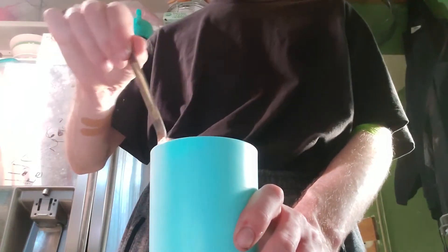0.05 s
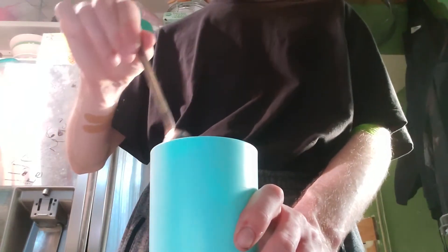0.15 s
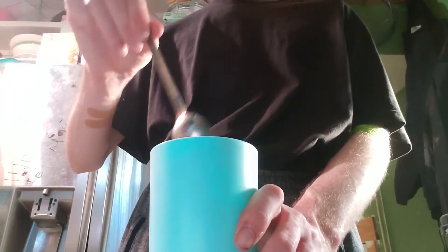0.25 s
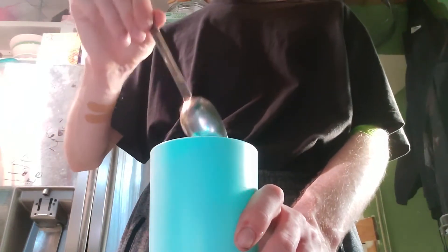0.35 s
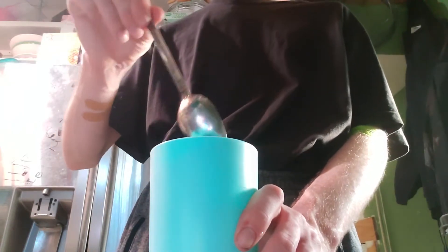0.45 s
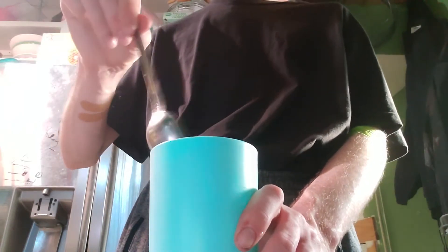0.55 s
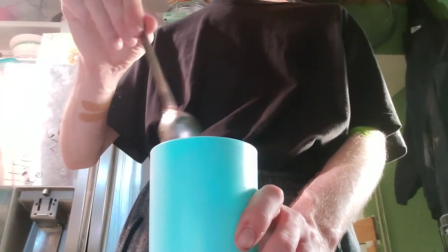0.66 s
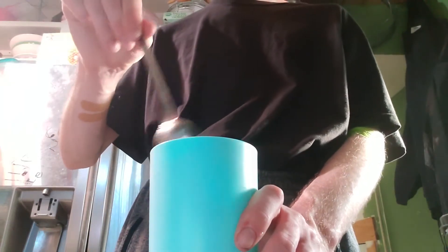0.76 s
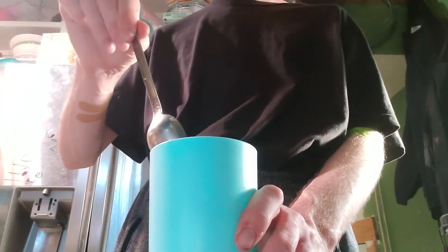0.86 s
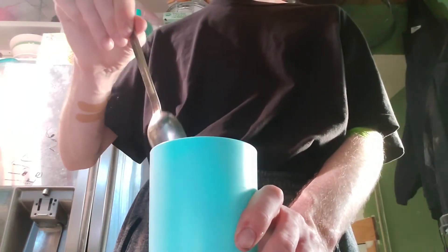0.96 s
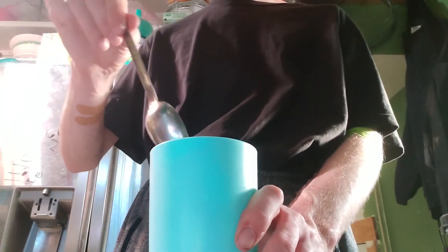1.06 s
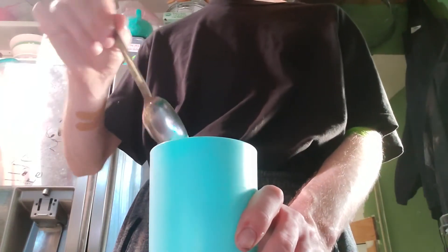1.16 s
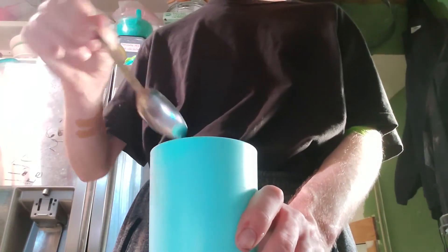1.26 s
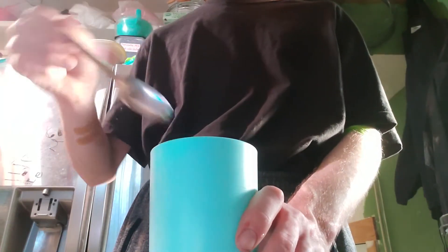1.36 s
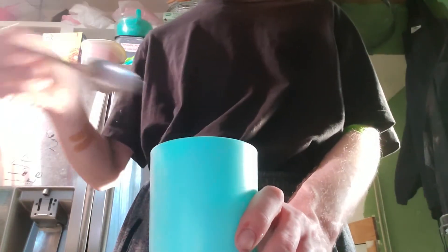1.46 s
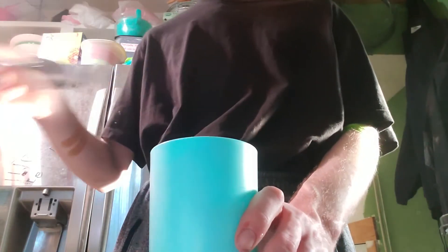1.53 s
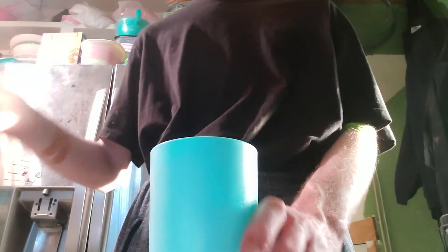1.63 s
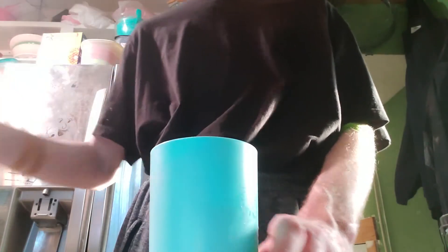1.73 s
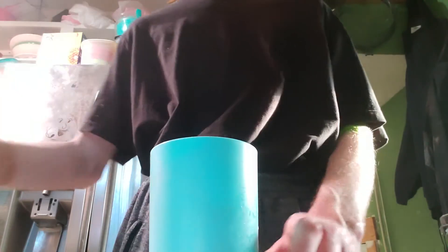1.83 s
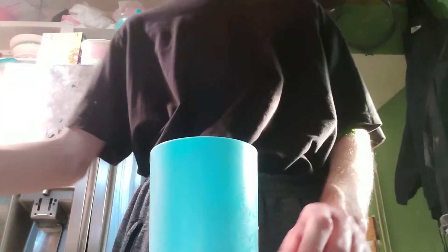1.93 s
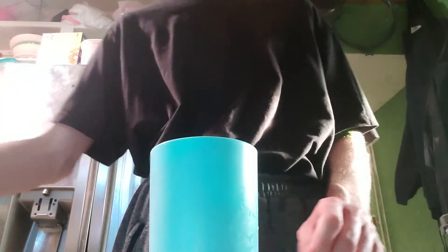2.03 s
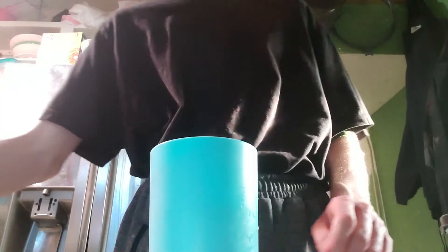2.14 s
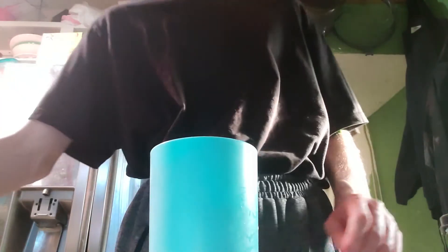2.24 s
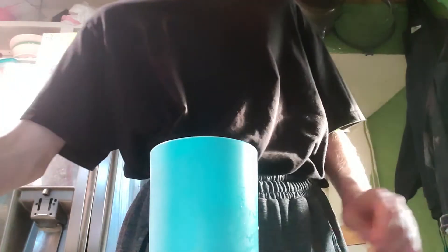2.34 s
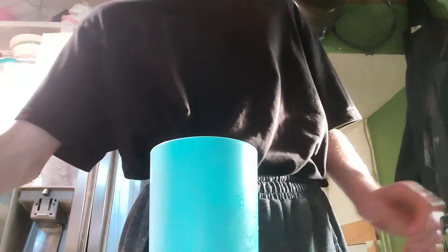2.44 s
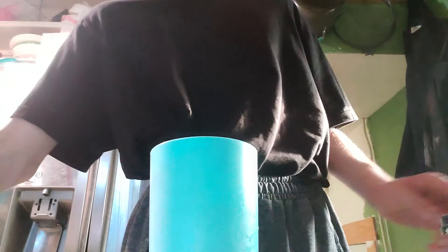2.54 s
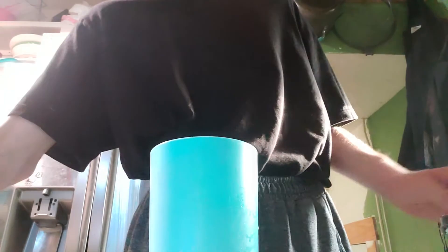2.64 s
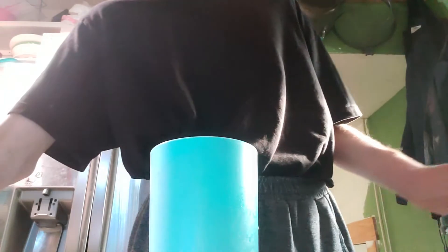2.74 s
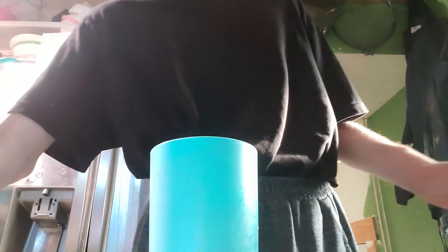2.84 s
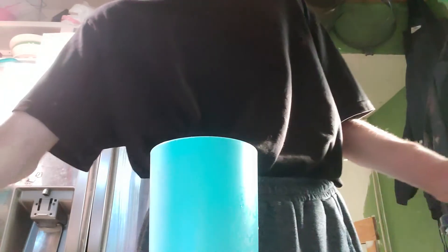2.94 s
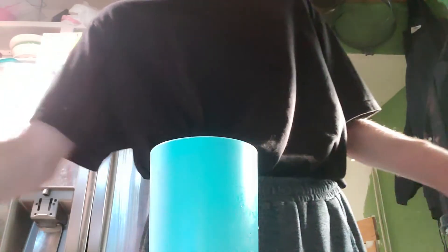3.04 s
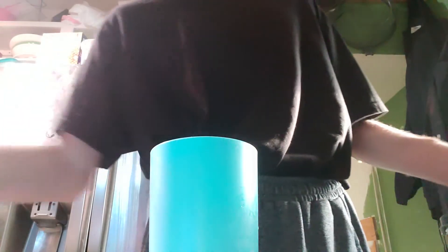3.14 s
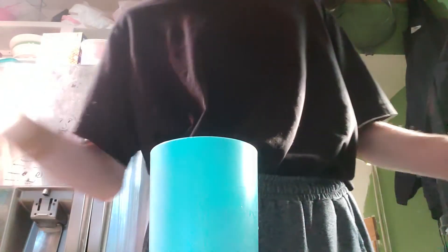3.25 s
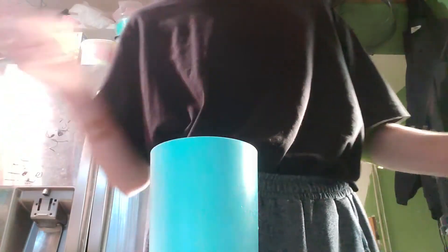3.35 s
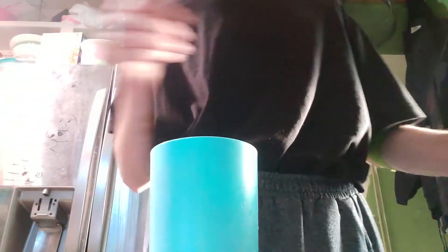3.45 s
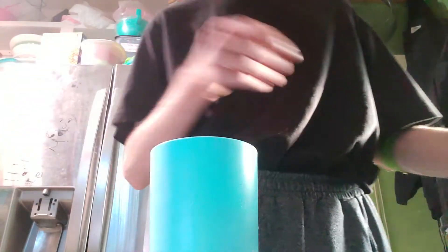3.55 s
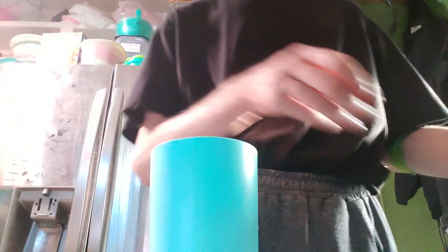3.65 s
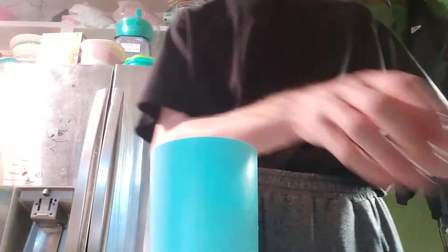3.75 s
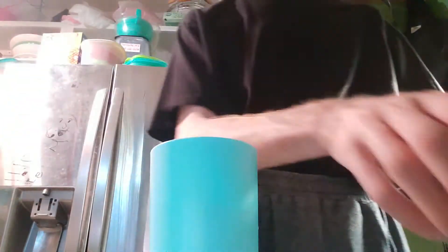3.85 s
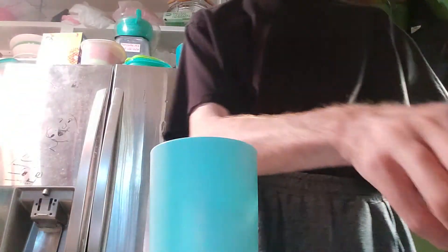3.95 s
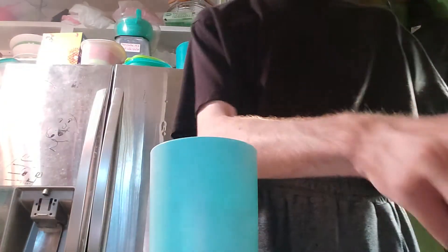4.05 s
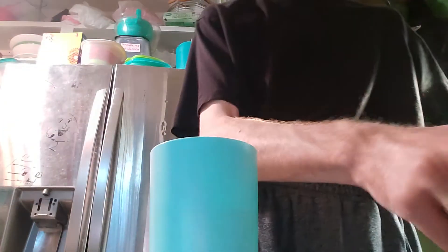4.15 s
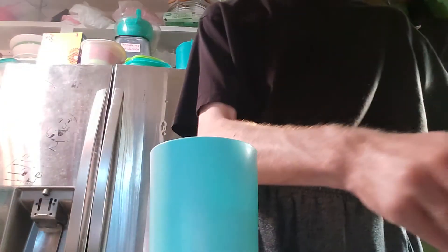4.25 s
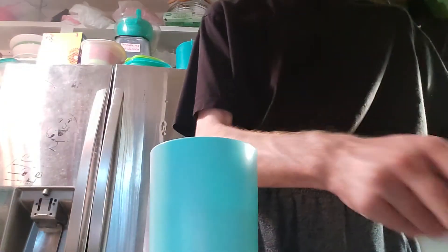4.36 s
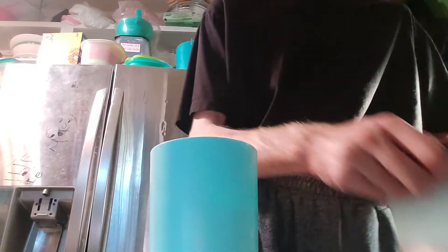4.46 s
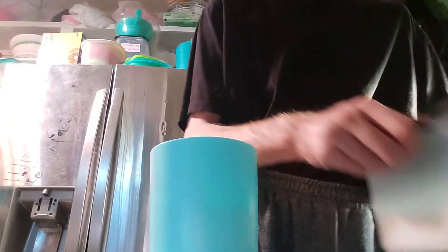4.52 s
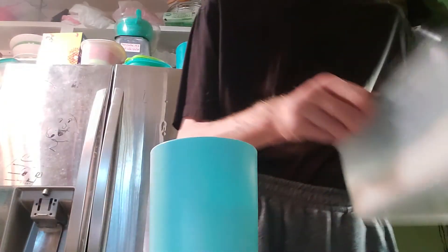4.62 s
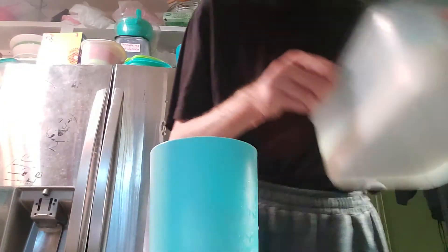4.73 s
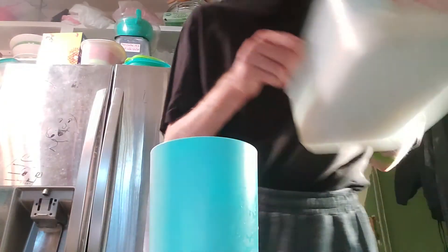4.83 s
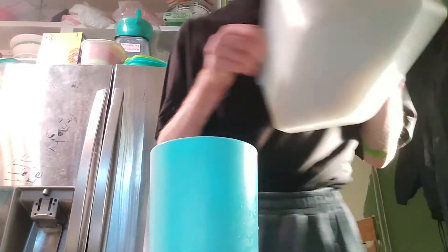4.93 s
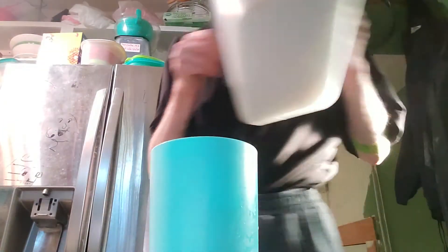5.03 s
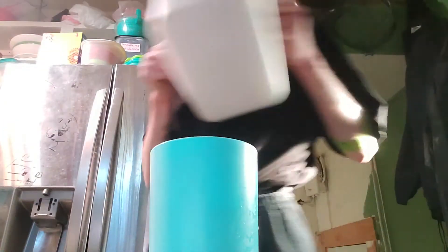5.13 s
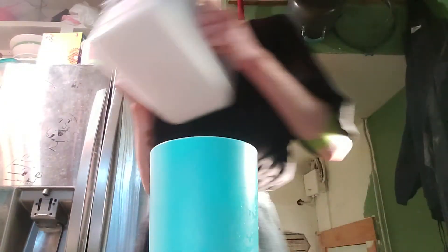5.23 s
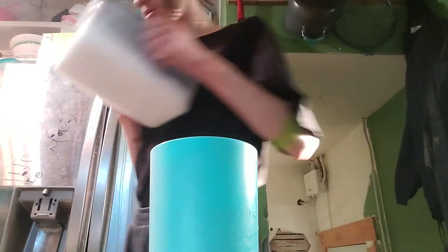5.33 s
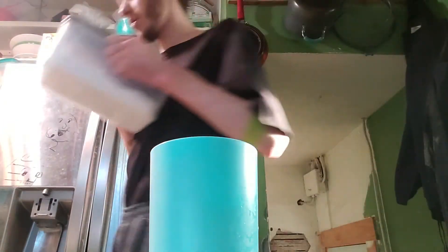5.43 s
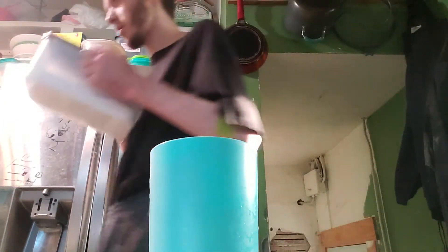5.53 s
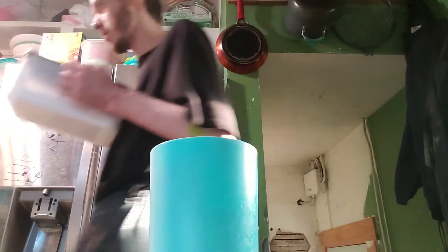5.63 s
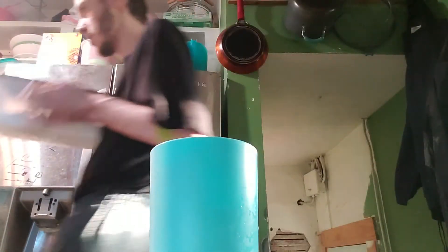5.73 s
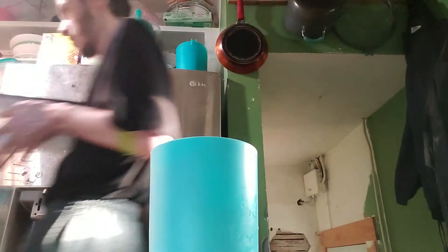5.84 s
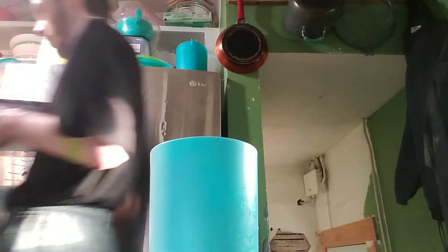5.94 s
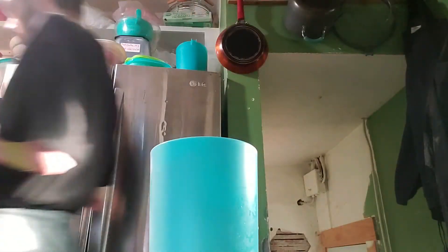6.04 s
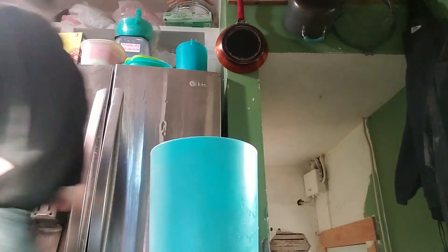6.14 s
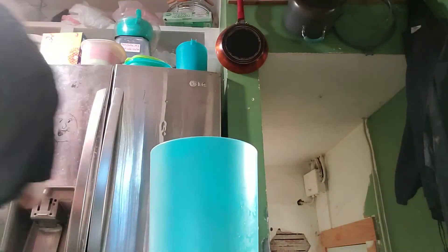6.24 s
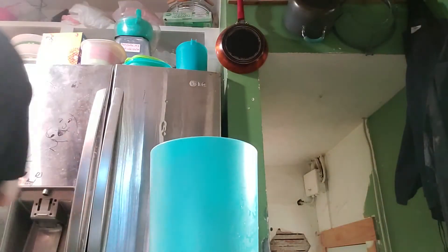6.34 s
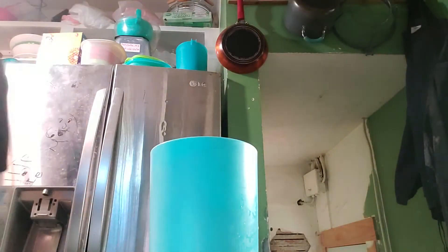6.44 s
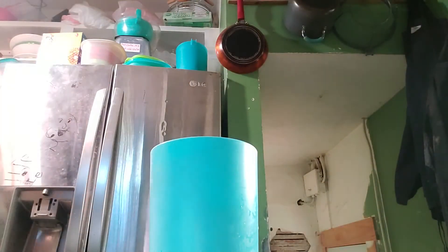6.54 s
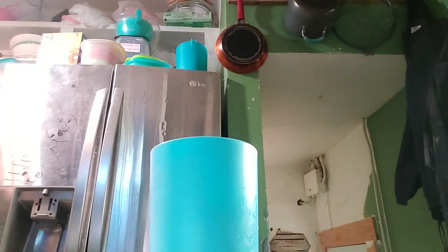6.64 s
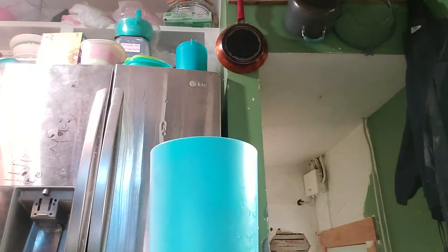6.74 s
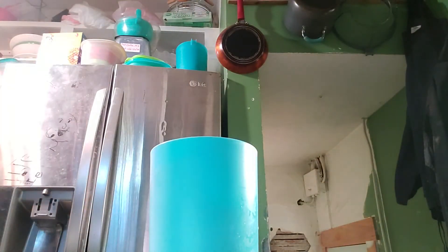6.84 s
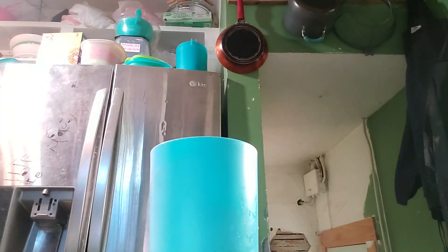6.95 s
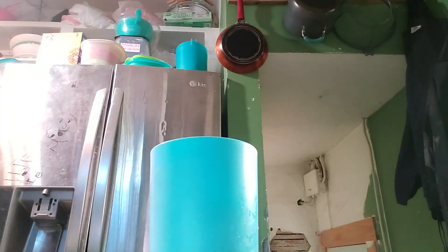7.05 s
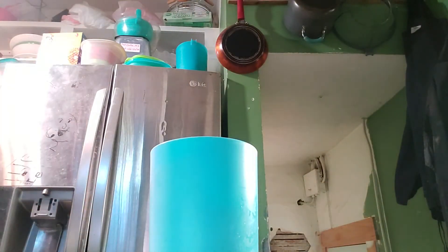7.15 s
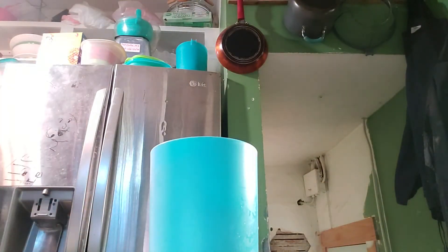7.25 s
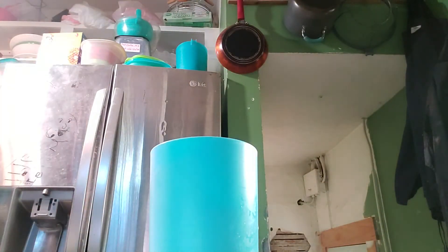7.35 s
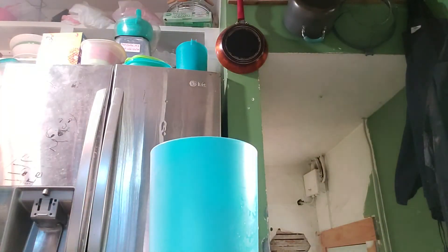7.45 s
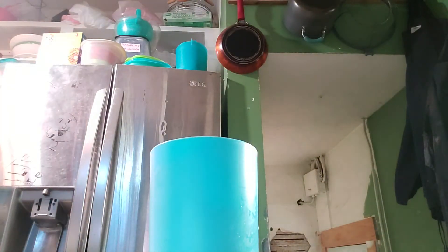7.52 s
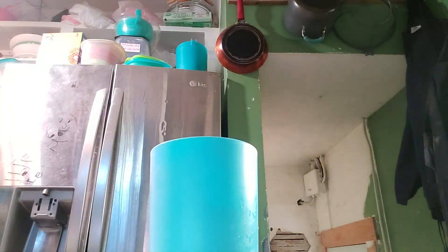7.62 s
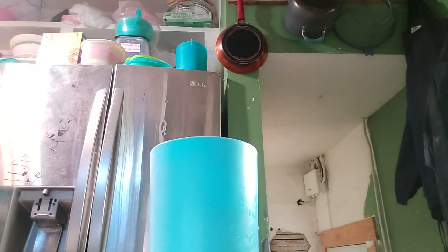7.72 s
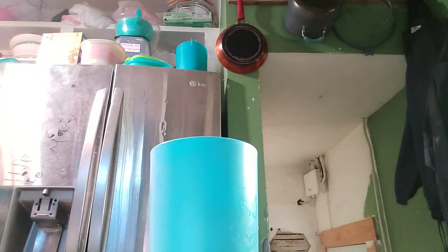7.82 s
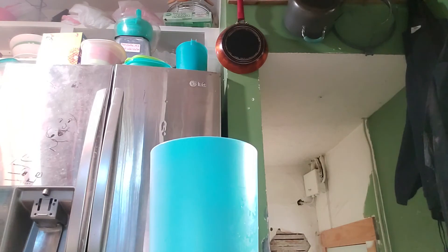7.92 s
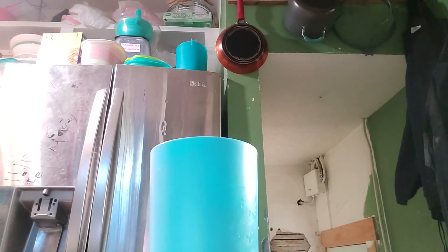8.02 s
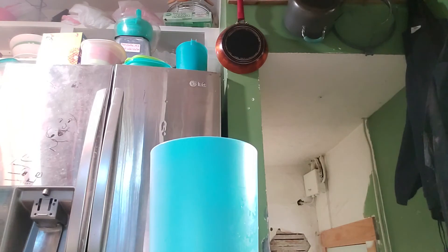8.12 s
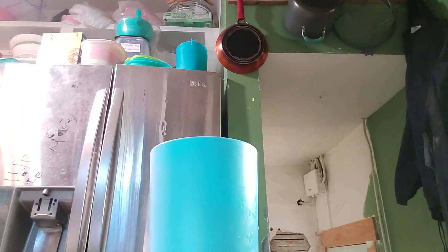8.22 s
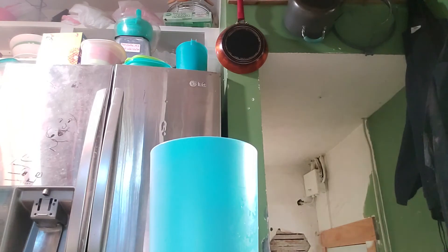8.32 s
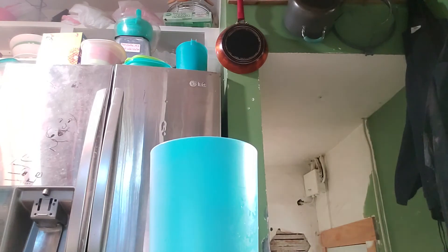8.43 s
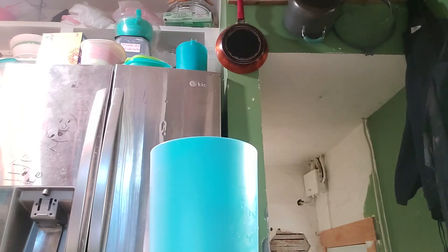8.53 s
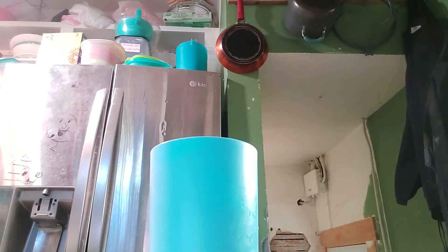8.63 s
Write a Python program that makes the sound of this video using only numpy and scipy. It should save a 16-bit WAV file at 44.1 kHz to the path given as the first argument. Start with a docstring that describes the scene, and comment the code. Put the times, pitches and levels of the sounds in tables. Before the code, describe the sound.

A spoon scrapes and taps a plastic cup, then clatters onto a counter; plastic knocks and shuffling slippers follow over a low fan hum.

```python
"""At a kitchen counter, close to a stereo microphone, a spoon scrapes and taps a plastic cup.
Near 3 s something hollow is set down, and the spoon bounces, rings and comes to rest.
Around 4 s a plastic tub is picked up with rubs and knocks; from 5 s slippers shuffle off over the floor.
A fan throbs behind it all; the recorder's gain ducks at the loud knocks and creeps back."""
import sys
import numpy as np
from scipy import signal
from scipy.fft import rfft, irfft, next_fast_len
from scipy.io import wavfile
from scipy.ndimage import uniform_filter1d

SR = 44100
rng = np.random.default_rng(int(sys.argv[2]) if len(sys.argv) > 2 else 0)


def wav_out(sig):
    """Save sig, one row per channel (or a flat mono array), as 16-bit PCM at SR to the path in sys.argv[1]."""
    wavfile.write(sys.argv[1], SR, np.round(np.clip(np.atleast_2d(sig).T, -1, 1) * 32767).astype(np.int16))


N = 382788
T = np.arange(N) / SR

# knocks on cup and tub close to the microphone, and a soft thud at 4.67 s: (time [s], thump level [dB], thump
# pitch [Hz], # crack level [dB], crack t60 [s], counter ring [dB], cup ring [dB])
PLASTIC_KNOCKS = [(0.053, -24, 163, -32, 0.064, -32, -41.5), (0.6337, -9, 151, -15, 0.066, -18.5, -28.5),
                  (0.8583, -3.5, 167, -20, 0.1, -15.5, -28.5), (0.896, -13.5, 116.7, -33, 0.13, -28, -47),
                  (0.966, -44, 200, -33.5, 0.076, -51, -41.5), (3.953, -38.5, 289.5, -60, 0.075, -38, -82),
                  (4.1236, -12, 251.3, -26, 0.026, -37, -67.5),
                  (4.1293, -25.5, 525, -29, 0.023, -31.5, -52), (4.249, -42.5, 920, -45, 0.049, -37, -75),
                  (4.312, -37.5, 870, -40, 0.086, -34, -68), (4.666, -33.5, 153.5, -52.5, 0.12, -49, -69),
                  (4.829, -57, 304, -51.5, 0.032, -66, -82)]
# modes of the cup's wall: (frequency [Hz], level [dB], t60 [s])
CUP_MODES = [(636.2, 2.5, 0.085), (824, -4.5, 0.15), (1185, -11.5, 0.088), (1604, -4.5, .08),
             (2047, -9, 0.042), (2320, -8, 0.02), (2924, 1.5, 0.071), (2980, -9, 0.042), (4140, 6.5, .018),
             (5530, -10, 0.1)]
# modes of the counter top when it rings freely: (frequency [Hz], level [dB], t60 [s])
COUNTER_MODES = [(75.5, -9.5, 0.46), (108, -8, 0.16), (151, -5.5, .24), (178, -1.5, .52), (221, -7, .36),
                 (243, -.5, .3), (318.7, -13, 0.22), (424, -9.5, .33), (463, -14.5, 0.42),
                 (545.6, -8.5, 0.19), (598, -9.5, 0.24), (672, -16.5, .25), (748, -18.5, .22),
                 (791, -20, .3), (932, -14.5, .28), (1063, -16.5, 0.21), (1140, -16.5, .33),
                 (1290, -24, .3), (1470, -20, .3), (1540, -17.5, .26), (1793, -21, .35), (2135, -22.5, .3),
                 (2307, -17.5, .3), (2562, -19, 0.5), (2660, -15.5, .3), (2951, -17.5, 0.33)]
def plastic_taps():
    """Plastic gives a dry crack and a hollow thump that runs on into the counter."""
    body = np.zeros((2, N))
    for s, thump_db, hz, _, _, counter_db, cup_db in PLASTIC_KNOCKS:
        add(body, s, from_db(thump_db) * thump(hz, swell_s=0.0031))
        add(body, s, from_db(cup_db) * strike(CUP_MODES, contact_hz=7000))
        add(body, s, from_db(counter_db) * strike(COUNTER_MODES, contact_hz=380, damping=1.3))
    times, _, _, crack_db, t60s, _, _ = np.transpose(PLASTIC_KNOCKS)
    knocks = body + cracks(times, crack_db, t60s, PLASTIC_CRACK)
    return butterworth(knocks, "high", hz=88, order=5)  # the knocks carry no deep bass


# strokes of the spoon along the cup's wall: (time [s], swell [s], hold [s], level [dB])
CUP_STROKES = [(.06, .02, 0.05, -60.5), (.22, .03, 0.021, -60), (.355, .04, 0.012, -57.5),
               (.45, .015, 0.079, -68.5), (.528, .016, .045, -51), (.945, 0.014, 0.0026, -57),
               (1.03, .012, 0.083, -70.5)]
# hiss of the spoon's edge: (frequency [Hz], level [dB])
SCRAPE_SPECTRUM = [(800, -23), (2000, -18), (2900, -11), (3600, -11), (4300, -2.5), (5200, -1),
                   (6500, -5.5), (7600, -18.5), (10000, -26.5), (13800, -23.5), (16000, -36.5)]
# modes that the sliding spoon makes sing: (frequency [Hz], relative level [dB], t60 [s])
SINGING_MODES = [(2760, -9.5, .014), (5050, -6.5, .012), (13780, -28, .03)]
def scrape(sing_db=-61, sing_follow=.35, lift_s=1.35, fade_s=0.15):
    """The spoon's edge hisses along the cup; even a light touch keeps thin tones singing until it lifts."""
    level_db = 20 * np.log10(strokes(CUP_STROKES))
    modes = sum(from_db(db) * ring(hz, t60) for hz, db, t60 in SINGING_MODES)
    singing = rms_one(signal.fftconvolve(rng.standard_normal((1, N)), modes, axes=1)[:, :N])
    touching = np.clip((lift_s - T) / fade_s, 0, 1) * from_db(2.5 * drift(22))
    pressure = from_db(sing_db + sing_follow * (level_db - level_db.max()))
    hiss = from_db(level_db + 2 * drift(170)) * noise(SCRAPE_SPECTRUM, ripple_db=3.5)
    return hiss + touching * pressure * singing


# things landing on the counter, close by: (time [s], counter ring [dB], contact hardness [Hz],
# crack level [dB], crack t60 [s], spoon ring [dB])
LANDINGS = [(2.7959, -14, 1500, -16.5, 0.094, -75.5), (2.803, -21.5, 1500, -23, 0.24, -76.5),
            (3.047, -31, 4000, -33, .035, -73), (3.0919, -9.5, 5000, -9, 0.18, -12),
            (3.102, -17, 3970, -20, 0.085, -16.5), (3.117, -12, 3984, -11.5, .12, -21.5),
            (3.173, -26, 3000, -33, 0.2, -21.5), (3.216, -9, 3004, -10.5, 0.3, -13.5),
            (3.284, -28.5, 3000, -27, 0.066, -30), (3.334, -22, 3000, -53, 0.1, -49)]
# modes of the hollow thing that lands first: (frequency [Hz], level [dB], t60 [s])
HOLLOW_MODES = [(510, -28.5, 0.084), (616, -19.5, 0.26), (702, -20, 0.11), (754.5, -19.5, 0.1),
                (884, -23.5, .14), (1657, -25, 0.091)]
# modes of the steel spoon: (frequency [Hz], level [dB], t60 [s], left over right [dB])
SPOON_MODES = [(4877, -20.5, .25, 6.5), (5499, 1.5, .2, 7.5), (6695, -6.5, .2, -1), (7935, -12.5, .4, -9),
               (8415, -15.5, .3, -5), (9222, -15.5, .2, 1), (9477, -4.5, .22, -4.5),
               (11039, -11.5, .22, -6), (11347, -3.5, 0.2, -1.5), (13740, -14, .22, -9.5),
               (14210, -20, .2, -3.5), (15110, -29.5, .22, 0)]
# crack of a landing: (frequency [Hz], level [dB])
LANDING_CRACK = [(60, -19), (150, -11), (400, -5), (900, -1), (1800, -6.5), (2700, -4.5), (3800, -14.5),
                 (6000, -10.5), (8000, -20.5), (12000, -22.5), (14200, -28), (14800, -38), (16000, -50)]
# the ring is choked as the clatter comes to rest: (time [s], gain [dB])
CHOKE = [(3.34, -4.5), (3.45, -29), (3.6, -48)]
def clatter():
    """A hollow clack on the counter; the spoon then bounces and rings at each touch until it lies still."""
    rings = np.zeros((2, N))
    times, _, _, crack_db, t60s, _ = np.transpose(LANDINGS)
    add(rings, times[0], strike(HOLLOW_MODES, contact_hz=4000))
    for s, counter_db, contact_hz, _, _, spoon_db in LANDINGS:
        add(rings, s, from_db(counter_db) * strike(COUNTER_MODES, contact_hz))
        for hz, mode_db, t60, pan_db in SPOON_MODES:
            push = rng.choice([-1, 1])  # each touch lands on another part of the spoon
            add(rings, s, push * from_db(spoon_db + mode_db) * pan(pan_db) * ring(hz, t60))
    return gain_curve(CHOKE) * (rings + cracks(times, crack_db, t60s, LANDING_CRACK))


# spoon, hands and tub sliding over rim and counter, near the microphone:
# (time [s], swell [s], hold [s], level [dB], brightness [dB])
COUNTER_SLIDES = [(.555, .028, 0.036, -64.5, 1), (.945, 0.0075, 0.0028, -54, -7),
                  (2.97, 0.092, 0.035, -44.5, -10.5), (3.535, 0.0053, 0.0053, -69.5, -29),
                  (3.94, 0.014, .03, -59, -32), (4.03, .012, .07, -72, -14),
                  (4.19, .06, 0.022, -54.5, -21.5), (4.298, 0.0074, .006, -48, -22),
                  (4.385, .012, 0.0063, -68.5, -0.5), (4.455, 0.017, 0.029, -65, -13),
                  (4.56, 0.024, 0.11, -79, -10), (4.75, 0.16, .22, -76.5, -3.5)]
# slippers scuffing over the floor: (time [s], swell [s], hold [s], level [dB], brightness [dB])
SLIPPER_SCUFFS = [(5.12, 0.061, 0.023, -52, -11.5), (5.205, .028, 0.076, -59.5, -6.5),
                  (5.312, 0.092, .025, -53, -10.5), (5.413, 0.037, 0.021, -60, -1.5),
                  (5.681, .012, 0.046, -67.5, -2), (5.757, 0.097, 0.031, -66, -3.5),
                  (5.909, .012, .14, -61, -13), (6.105, .012, 0.077, -62, -9),
                  (6.179, .025, 0.028, -50.5, -7.5), (6.246, 0.058, 0.046, -47.5, -8),
                  (6.359, 0.014, 0.064, -55, -4.5), (6.538, .02, 0.017, -61, -6.5),
                  (6.71, 0.053, .015, -66.5, 2), (6.775, 0.018, 0.012, -53, -7),
                  (6.912, 0.03, .03, -60, -4), (6.956, 0.038, 0.17, -47.5, -9),
                  (7.577, 0.021, 0.081, -69.5, 7.5), (7.715, 0.081, 0.051, -58.5, -3.5),
                  (7.832, .015, 0.0085, -52.5, -10), (8.148, .025, 0.26, -65.5, -9.5),
                  (8.429, .012, 0.049, -70, 1), (8.519, .014, .14, -57, -10.5)]
# friction of the rubbed surfaces: (frequency [Hz], level [dB])
FRICTION_SPECTRUM = [(90, -9), (250, 1), (560, 0), (760, 6.5), (1100, -0.5), (1900, -2), (2800, -1.5),
                     (3900, -16), (5500, -7.5), (6800, -12.5), (8000, -23.5), (12500, -23), (15000, -40.5)]
def rubbing(body_db=5.0, treble_db=2.0, split_hz=4000):
    """Fine stick and slip sounds through the surface's resonances, each stroke with its own brightness."""
    surface = noise(FRICTION_SPECTRUM, ripple_db=3.2, ripple_hz=60)
    friction = surface * from_db(drift(180) + drift(35))  # fine grain and slower unevenness
    low = rms_one(butterworth(friction, "low", split_hz, order=4))
    high = rms_one(butterworth(friction, "high", split_hz, order=4))
    rows = [*COUNTER_SLIDES, *SLIPPER_SCUFFS]
    body = strokes([(*timing, db + body_db) for *timing, db, _ in rows])
    treble = strokes([(*timing, db + bright_db + treble_db) for *timing, db, bright_db in rows])
    return body * low + treble * high


# steps farther from the microphone: (time [s], level [dB], pitch [Hz])
HEEL_THUDS = [(5.126, -35.5, 95.7), (5.197, -32.5, 206), (5.173, -31, 64.8), (6.362, -32.5, 215),
              (6.397, -36, 106.5), (6.933, -30.5, 112), (6.94, -30, 212), (6.96, -30.5, 88.5)]
def footfalls():
    """Soft heels thud on the floor."""
    thuds = np.zeros(N)
    for s, db, hz in HEEL_THUDS:
        add(thuds, s, from_db(db) * thump(hz, swell_s=0.0047))
    return thuds


# hum of the fan's housing: (harmonic [multiple of the turn rate], relative level [dB])
FAN_HARMONICS = [(1, -41.5), (2, -33.5), (3, -9.5), (4, -16), (5, -3), (6, -9), (7, -6.5), (8, 4),
                 (9, -13.5), (10, -5), (11, -7), (12, -5.5), (13, -8), (14, -28.5), (15, -19.5),
                 (16, -14.5), (17, -3), (18, -22.5), (19, -9.5), (20, -26), (21, 1), (22, -24.5), (23, -9),
                 (24, -14.5), (25, -12), (26, -15), (31, -16.5), (36, -27.5)]
# air rushing through the fan: (frequency [Hz], level [dB])
AIR_SPECTRUM = [(20, -27.5), (50, -6), (110, -0.5), (200, -2.5), (275, -13), (355, -0.5), (420, -8),
                (470, -5), (600, -16.5), (800, -26.5), (1100, -42), (2000, -52.5), (5000, -74.5)]
# the fan's loudness, sinking as the recorder's gain ducks after the clatter, then recovering:
# (time [s], level [dB])
FAN_LOUDNESS = [(0, -45.5), (1.5, -46), (2.3, -43.5), (3.7, -47.5), (5.3, -43.5), (6.5, -42.5), (7.5, -44),
                (8.68, -44)]
def fan(turn_hz=18.91, wander=.0012, throb=.55, rush_db=-5.0, hum_db=-2.0, width_rad=0.16):
    """A fan shakes its housing the same way on every turn and hums; its air rushes in a faint beat."""
    turns = np.cumsum(turn_hz * (1 + wander * drift(3))) / SR
    one_turn = np.arange(2048) / 2048
    orders, order_db = np.transpose(FAN_HARMONICS)
    phases = 2 * np.pi * rng.random(len(orders))
    stereo_shift = width_rad * rng.standard_normal(len(orders)) * [[1], [-1]]
    lines = np.zeros((2, len(one_turn) // 2 + 1), complex)
    lines[:, np.round(orders).astype(int)] = from_db(order_db) * np.exp(1j * (phases + stereo_shift))
    hum = rms_one(np.array([np.interp(turns % 1, one_turn, cycle) for cycle in irfft(lines)]))
    rush = rms_one(noise(AIR_SPECTRUM) * np.exp(throb * np.cos(2 * np.pi * turns)))
    return gain_curve(FAN_LOUDNESS) * (from_db(hum_db) * hum * pan(-0.72) + from_db(rush_db) * rush)


# echo of the kitchen's walls: (frequency [Hz], level [dB])
ECHO_SPECTRUM = [(60, -3.5), (200, 1.5), (600, 0), (2000, -3), (6000, -5), (12000, -4), (16000, -8.5)]
def kitchen_echo(sound, t60=0.27, build_s=.008):
    """The walls answer with a short, diffuse tail."""
    age = T[:SR]
    build_up = 1 - np.exp(-(age / build_s) ** 2)
    tail = noise(ECHO_SPECTRUM, size=SR) * from_db(-60 * age / t60) * build_up
    return signal.fftconvolve(sound, tail / np.sqrt(np.sum(tail ** 2) / 2), axes=1)[:, :N]


# hiss behind everything: (frequency [Hz], level [dB])
HISS_SPECTRUM = [(500, 4.5), (1500, 5.5), (2200, -1), (2800, 4), (3900, -9.5), (5200, 2.5), (6500, -8),
                 (9000, -6), (12000, -1.5), (16000, -9)]
def background_hiss():
    """A faint, steady hiss lies under the scene."""
    return from_db(-75.5) * noise(HISS_SPECTRUM)


# how alike the microphone's two ports hear the room: (frequency [Hz], correlation [-1 to 1])
PORT_LIKENESS = [(60, 0.99), (150, 0.95), (300, 1), (600, 0.43), (1100, -0.074), (2500, 0.039), (8000, 0),
                 (15000, -0.16)]
# colour of the two ports: (frequency [Hz], left over right [dB])
PORT_BALANCE = [(60, -1.5), (200, -2), (1000, 2), (2600, -1.5), (4800, 7.5), (7500, 1), (10000, 0),
                (15000, -5)]
def noise(spectrum, size=N, ripple_db=0., ripple_hz=44.95):
    """Coloured stereo noise of rms 1, rippled by resonances; alike in the bass, unrelated in the treble."""
    padded = next_fast_len(size, True)
    mid, side = rfft(rng.standard_normal((2, padded)))
    hz = np.fft.rfftfreq(padded, 1 / SR)
    ripple = ripple_db * np.interp(hz / ripple_hz, np.arange(2000), rng.standard_normal(2000))
    alike = np.clip(over_frequency(PORT_LIKENESS, hz), -.99, .99)
    stereo = np.sqrt(1 + alike) * mid + np.sqrt(1 - alike) * side * [[1], [-1]]
    colour = from_db(over_frequency(spectrum, hz) + ripple)
    balance = pan(over_frequency(PORT_BALANCE, hz))
    return rms_one(irfft(stereo * colour * balance, padded)[:, :size])


# dry crack of knocked plastic: (frequency [Hz], level [dB])
PLASTIC_CRACK = [(150, 15.5), (400, 11), (800, -4), (1400, 1), (2800, 1), (3600, -9.5), (4600, -3),
                 (6500, -4.5), (9000, -19), (13000, -25), (16000, -38.5)]
def cracks(times, levels_db, t60s, spectrum):
    """Each contact excites a dense crowd of short-lived modes."""
    envelope = np.zeros(N)
    for s, db, t60 in zip(times, levels_db, t60s):
        add(envelope, s, from_db(db - 60 * T[:SR] / t60))
    return envelope * noise(spectrum, ripple_db=2.5)


def thump(hz, swell_s):
    """A heavily damped body swings up within a few cycles and stops."""
    age = T[:SR] / swell_s
    return np.sin(2 * np.pi * hz * T[:SR]) * age * np.exp(1 - age)


def ring(hz, t60, lag_s=0.00006):
    """A struck mode dies away, reaching the microphone's two ports slightly out of step."""
    age = T[:SR // 2]
    phase = np.minimum(np.pi * hz * lag_s, np.pi / 4) * np.array([[1], [-1]])
    return np.sin(2 * np.pi * hz * age + phase) * from_db(-60 * age / t60)


def strike(modes, contact_hz, damping=1):
    """One blow on a body; a soft contact leaves the high modes quiet, a resting hand shortens the ring."""
    sound = 0
    for k, (hz, db, t60) in enumerate(modes):
        height = from_db(db + rng.normal()) / (1 + (hz / contact_hz) ** 2)
        sound += (-1) ** k * height * ring(hz, t60 / damping)
    return sound


def strokes(rows, catch_s=.008, swell_db=10, sag_db_per_s=17.5, release_db_per_s=190):
    """Gain of sliding contacts: each catches, swells, sags and dies away; overlaps add in power."""
    power = np.zeros(N)
    age = T[:SR]
    catch = np.minimum(age / catch_s, 1)
    for s, swell_s, hold_s, db in rows:
        swell = swell_db * np.minimum(age / max(swell_s, catch_s / 2) - 1, 0)
        sag = sag_db_per_s * np.maximum(age - swell_s, 0)
        release = release_db_per_s * np.maximum(age - swell_s - hold_s, 0)
        add(power, s, (catch * from_db(db + swell - sag - release)) ** 2)
    return np.sqrt(power + 1e-12)


def from_db(db):
    return 10 ** (np.asarray(db) / 20)


def rms_one(x):
    return x / np.sqrt(np.mean(x ** 2) + 1e-20)


def butterworth(x, kind, hz, order):
    return signal.sosfilt(signal.butter(order, hz, kind, fs=SR, output="sos"), x)


def gain_curve(points):
    """A gain that moves in straight lines of dB between points in time."""
    return from_db(np.interp(T, *np.transpose(points)))


def over_frequency(points, hz):
    """A table's values, joined over log frequency."""
    table_hz, values = np.transpose(points)
    return np.interp(np.log(hz + 1e-3), np.log(table_hz), values)


def pan(db):
    """Left and right gains for a level difference."""
    return from_db(np.array([[.5], [-.5]]) * db)


def drift(rate_hz):
    """A random wander with a spread of about 1."""
    return np.interp(T * rate_hz, np.arange(8000), rng.standard_normal(8000))


def add(track, s, sound):
    """Lay a sound into a track at a time."""
    start = round(s * SR)
    track[..., start:start + sound.shape[-1]] += sound[..., :N - start]


def scene():
    """From the counter: knocks close by, steps farther off with more echo, and the fan behind."""
    cup = plastic_taps() + scrape()
    landings = clatter()
    steps = footfalls()
    echo = kitchen_echo(from_db(-13.0) * cup + from_db(-8.5) * landings + from_db(-6.5) * steps)
    return cup + landings + steps + echo + rubbing() + fan() + background_hiss()


def record(dry, threshold_db=-12.0, release_db_per_s=0.5, attack_s=0.0055, top_hz=15400):
    """The recorder cuts deep bass, ducks at loud knocks and recovers slowly, clips, and cuts the top."""
    heard = butterworth(dry, "high", hz=48, order=3)
    power = uniform_filter1d(np.mean(heard ** 2, axis=0), size=441)  # over 10 ms
    over_db = np.maximum(10 * np.log10(np.abs(power) + 1e-12) - threshold_db, 0)
    held_db = np.maximum.accumulate(over_db + release_db_per_s * T) - release_db_per_s * T
    pole = np.exp(-1 / (attack_s * SR))
    duck_db = signal.lfilter([1 - pole], [1, -pole], held_db)
    clipped = np.clip(heard * from_db(-duck_db), -.88, .88)
    return signal.sosfilt(signal.ellip(10, .1, 80, top_hz, fs=SR, output="sos"), clipped)


dry = scene()
out = record(dry)
wav_out(out)
```